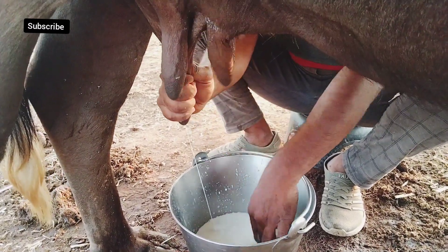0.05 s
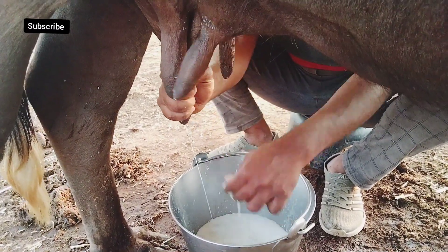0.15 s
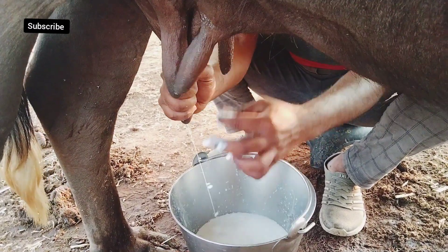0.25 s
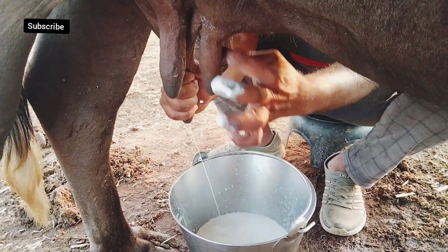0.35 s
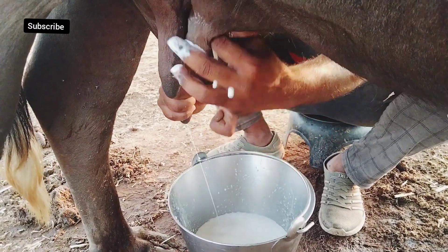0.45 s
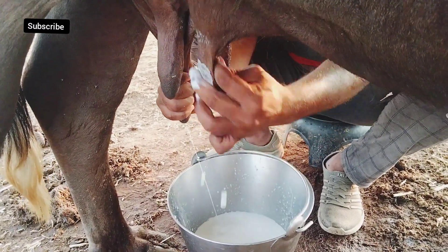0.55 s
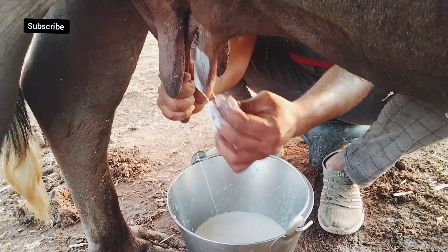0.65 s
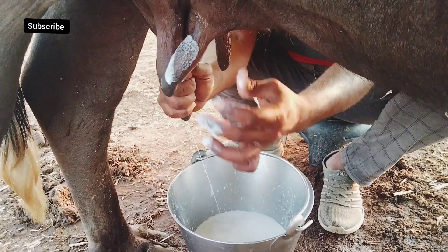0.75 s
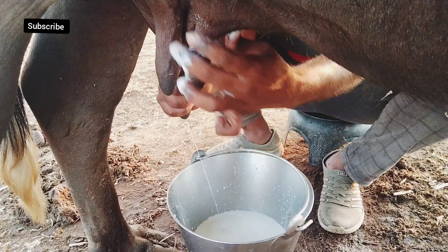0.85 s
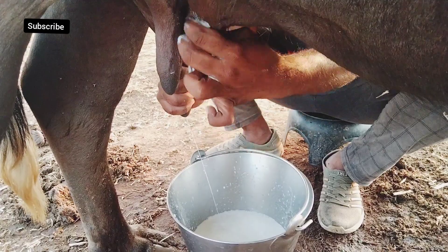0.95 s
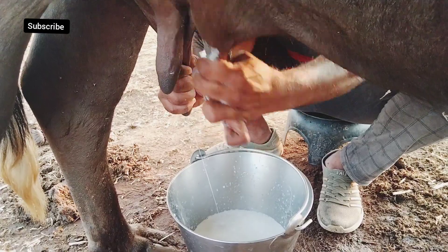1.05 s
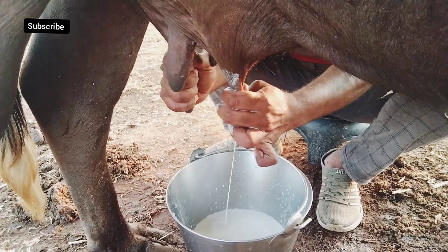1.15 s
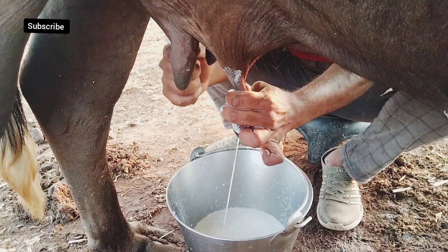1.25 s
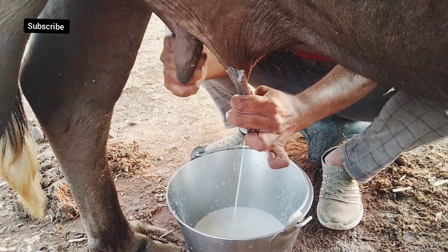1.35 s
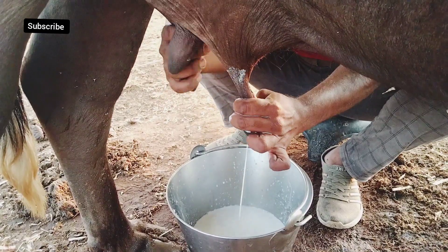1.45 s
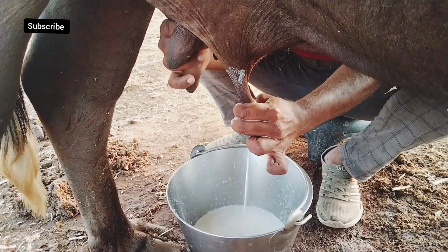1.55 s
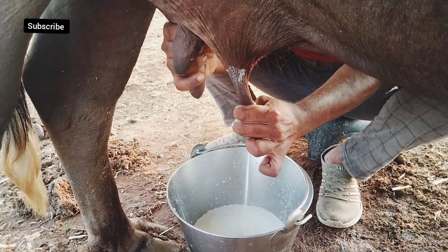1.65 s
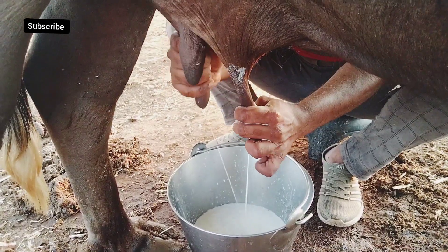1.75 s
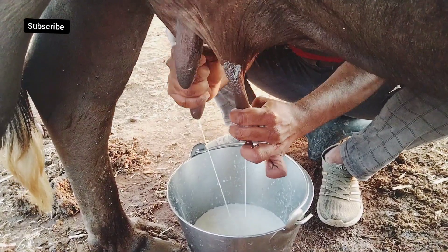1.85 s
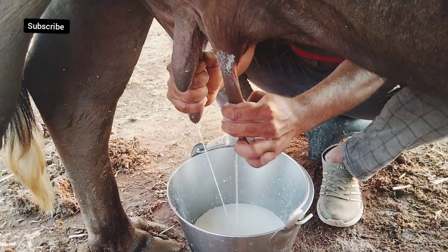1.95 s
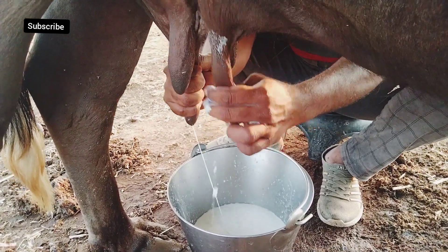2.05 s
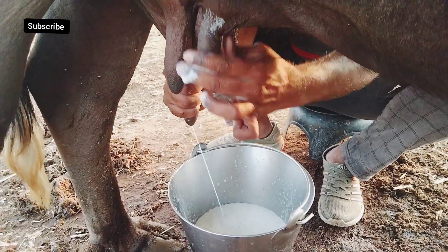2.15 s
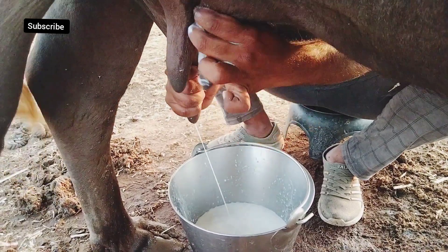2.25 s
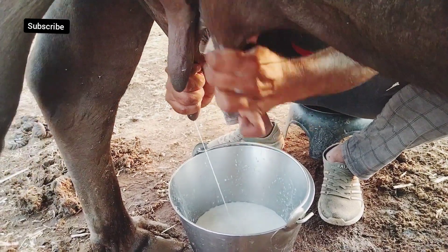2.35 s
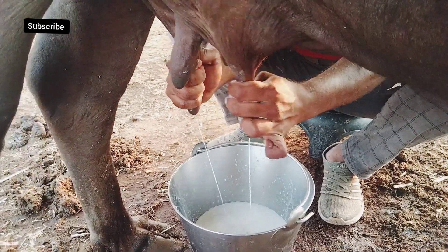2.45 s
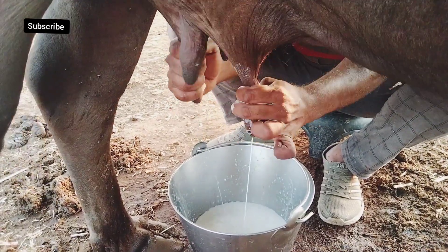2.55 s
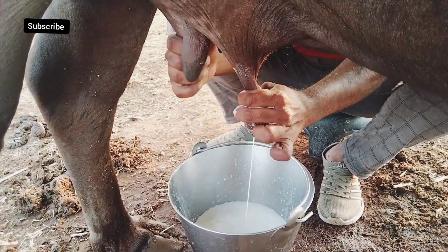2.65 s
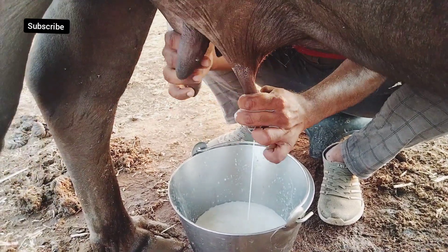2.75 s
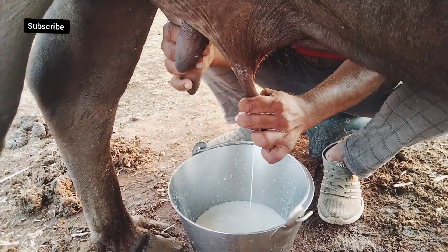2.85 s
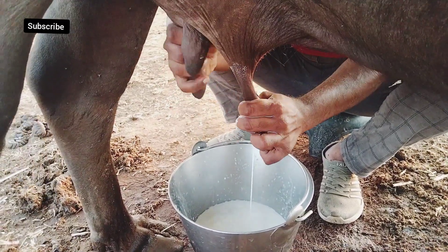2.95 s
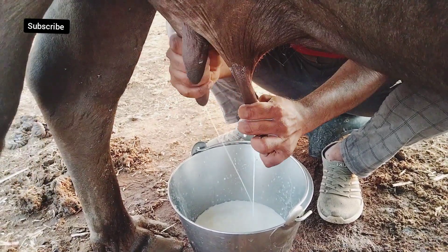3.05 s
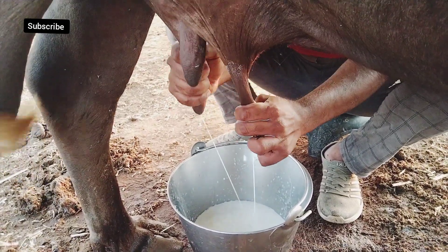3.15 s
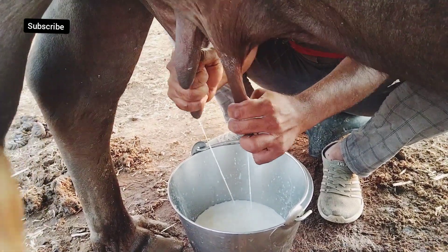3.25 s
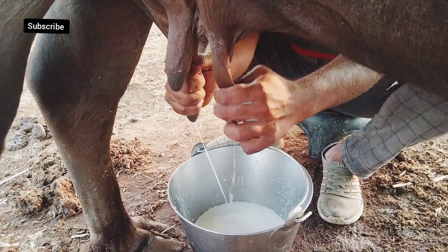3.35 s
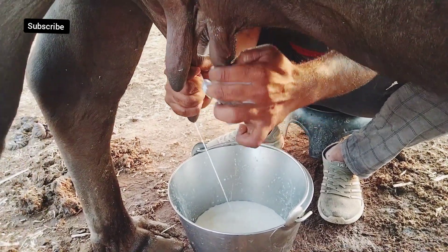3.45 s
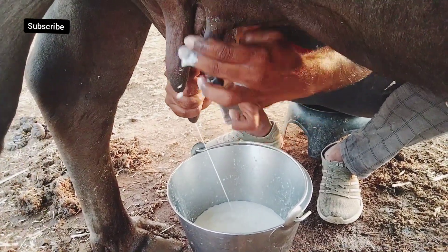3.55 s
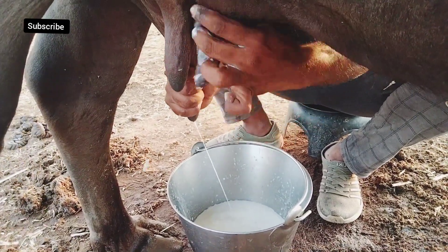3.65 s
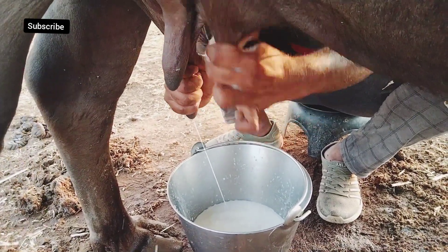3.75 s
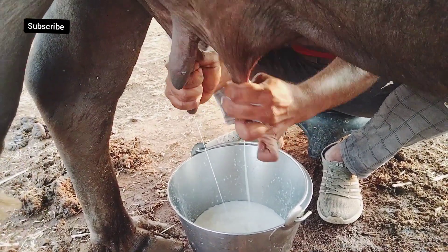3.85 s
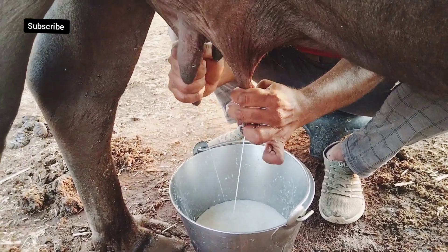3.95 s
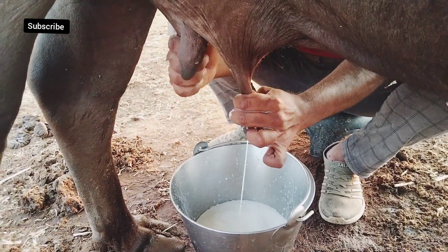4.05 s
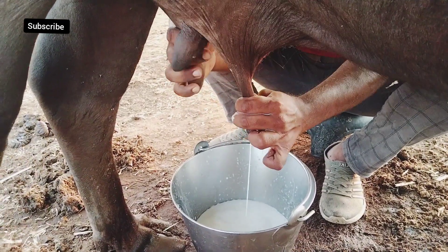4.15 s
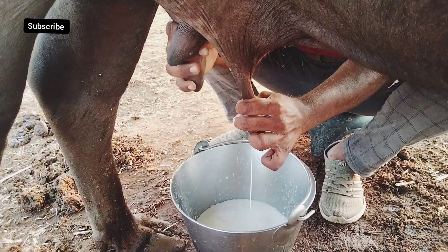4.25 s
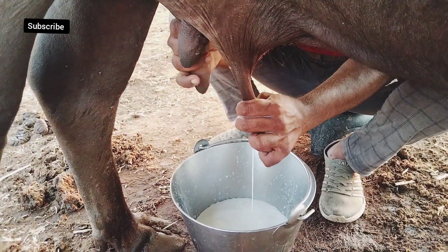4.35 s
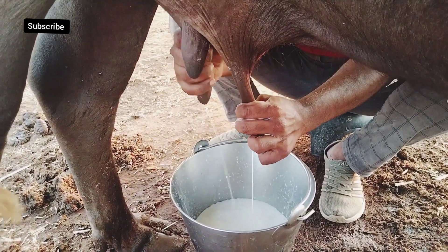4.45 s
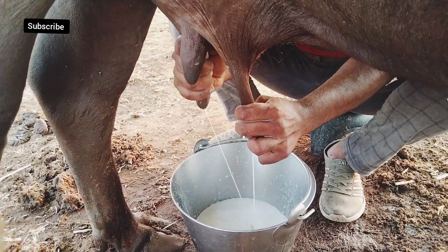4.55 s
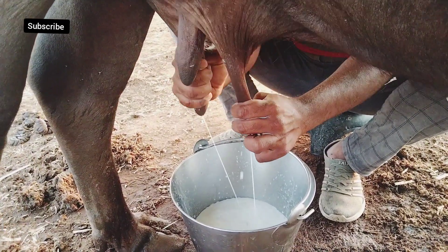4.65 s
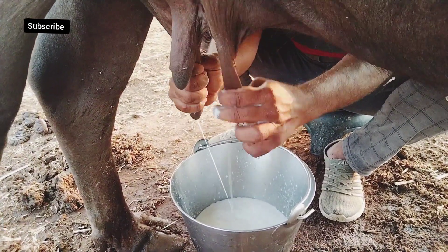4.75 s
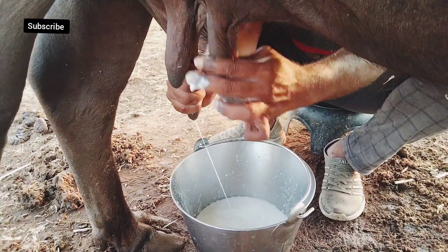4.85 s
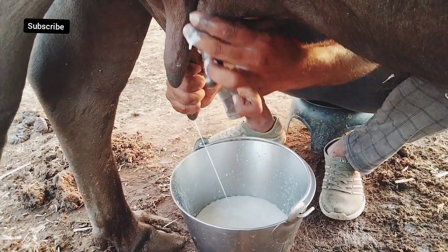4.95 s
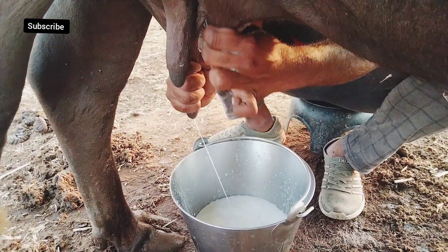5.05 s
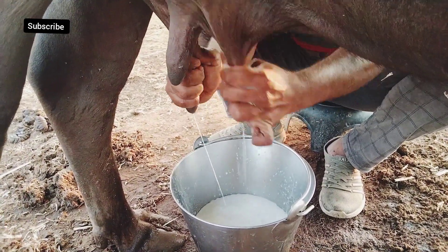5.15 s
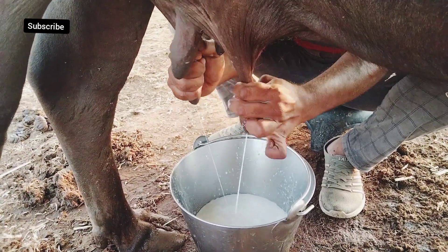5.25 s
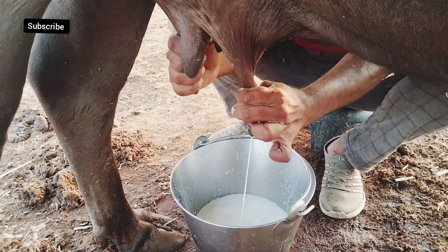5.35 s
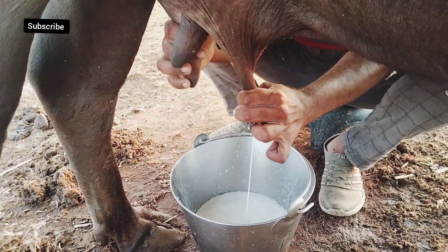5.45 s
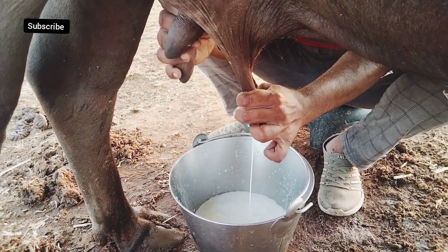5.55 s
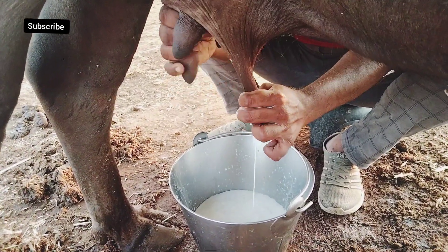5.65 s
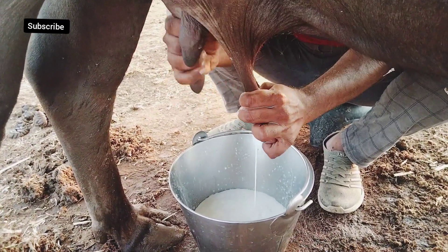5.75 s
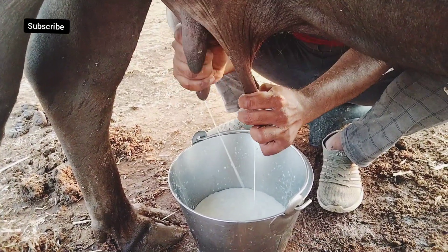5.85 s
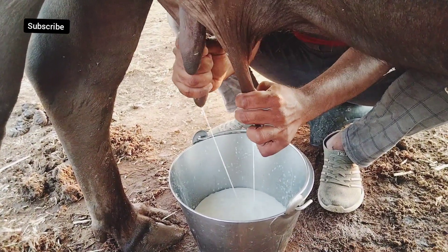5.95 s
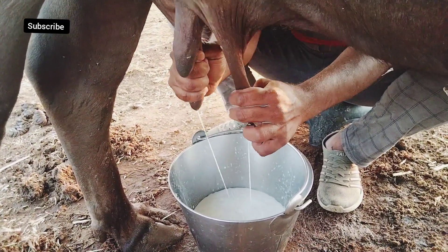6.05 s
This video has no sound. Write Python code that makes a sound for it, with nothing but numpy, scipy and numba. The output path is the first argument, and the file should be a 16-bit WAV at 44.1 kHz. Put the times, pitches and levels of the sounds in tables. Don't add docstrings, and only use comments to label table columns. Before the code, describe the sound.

Close outdoor sound of hand milking. At first only a dying trickle, tiny flicks of liquid, a dull thump, a short bell ring and a bird note. From just after one second, overlapping squirts hit frothy milk in a metal bucket about three or four times a second, with wet slaps, low gulps and fizzy spray, continuing to the end. The pail adds hollow ringing; the yard is faint and dry.

```python
import sys
import numpy as np
from scipy import signal
from scipy.fft import rfft, irfft, next_fast_len
from scipy.io import wavfile
from scipy.ndimage import uniform_filter1d
from numba import njit

SR = 44100
rng = np.random.default_rng(int(sys.argv[2]) if len(sys.argv) > 2 else 0)


def volts_from_db(level):
    exponent = np.asarray(level, float) / 20
    return 10 ** exponent


def unload_audio(sound):
    columns = np.transpose(np.atleast_2d(sound))
    steps = np.round(np.clip(columns, -1, 1) * 32767)
    wavfile.write(sys.argv[1], SR, steps.astype(np.int16))


N = 269451
TIME = np.arange(N) / SR


def unit_rms(x):
    return x / np.sqrt(np.mean(x ** 2))


@njit
def grains(rows, n):
    y = np.zeros(n)
    for r in rows:
        first, length = int(r[0] * SR), int(5 * r[2] * SR / r[1])
        phasor = r[3] + 0j
        advance = np.exp((2j * np.pi - 1 / r[2]) * r[1] / SR)
        glide = np.exp(2j * np.pi * r[1] * r[4] / SR / length)
        for k in range(first, min(first + length, n)):
            y[k] += phasor.imag
            phasor *= advance
            advance *= glide
    return y


def walk(rate, size=N):
    k = int(SR / rate)
    held = np.repeat(rng.standard_normal(size // k + 1), k)
    return 1.12 * uniform_filter1d(uniform_filter1d(held, k), k)[:size]


def resonances(hz, peaks, order=2):
    return sum(gain_db / (1 + (2 * (hz - f) / width) ** order) for f, width, gain_db in peaks)


def colour(x, table, lo_hz, hi_hz, rings=()):
    size = 8192
    hz, own = signal.welch(x, SR, nperseg=size)
    hz = hz + 1
    table_hz, table_db = np.transpose(table)
    db = np.interp(np.log(hz), np.log(table_hz), table_db)
    db = db - 10 * np.log10(uniform_filter1d(own, size=41) + 1e-18)
    db = db - 10 * np.log10((1 + (lo_hz / hz) ** 8) * (1 + (hz / hi_hz) ** 8))
    db = db + resonances(hz, rings)
    cepstrum = irfft(db * np.log(10) / 20)
    cepstrum[1:size // 2] *= 2
    cepstrum[size // 2 + 1:] = 0
    response = irfft(np.exp(rfft(cepstrum)))
    return unit_rms(signal.fftconvolve(x, response)[:N])


def arch(start, length, power):
    span = slice(int(start * SR), int((start + length) * SR))
    part = (TIME[span] - start) / length
    return span, part, np.abs(np.sin(np.pi * part)) ** power


def yard_air():
    # t/s, level/dB
    yard = [(0, 4.5), (.9, 10), (1.2, 8), (1.4, 16), (6.11, 18)]
    # f/Hz, level/dB per Hz
    floor = [(30, 18), (90, -3), (200, -10), (700, -9), (1500, -15), (3000, -20), (8000, -26), (15700, -26)]
    swell_db = 3 * walk(3.1)
    level_db = -70.5 + np.interp(TIME, *np.transpose(yard)) + swell_db
    return volts_from_db(level_db) * colour(rng.standard_normal(N), floor, 24.0, 13000)


def insects():
    # start t/s, end t/s, f/Hz, width/Hz, level/dB
    buzzes = [(0, .37, 3400, 200, -60), (0, .33, 1050, 130, -55), (0, .53, 670, 130, -58),
              (.85, 1.15, 4345, 120, -72), (.15, .37, 1830, 110, -59), (.55, .952, 1700, 140, -68),
              (.22, .53, 4330, 110, -72), (0, .18, 5000, 100, -74), (0, .1, 4300, 150, -70),
              (.13, .27, 4600, 120, -71), (.12, .2, 1560, 90, -70), (.49, .53, 880, 90, -63),
              (0, .36, 480, 80, -52), (.4, .62, 470, 120, -55), (.53, .8, 450, 90, -57),
              (.375, .63, 150, 130, -65), (.7, 1.05, 450, 90, -54), (.7, .86, 590, 70, -68),
              (.71, .745, 1270, 60, -70), (.58, .632, 2170, 70, -67), (.79, .88, 960, 70, -66),
              (.8, .835, 2600, 80, -67)]
    out = np.zeros(N)
    for start, end, hz, width, db in buzzes:
        span, part, shape = arch(start, end - start, 0.49)
        wander = walk(width, size=len(part)) + 1j * walk(width, size=len(part))
        tone = (wander * np.exp(2j * np.pi * hz * TIME[span])).real
        out[span] += volts_from_db(db - 11.6 * part + 4.1 * walk(26.7, size=len(part))) * shape * tone
    return out


def birds():
    # start t/s, length t/s, first f/Hz, last f/Hz, level/dB
    notes_sung = [(0.508, 0.11, 3780, 3200, -76), (0.685, 0.055, 3590, 3180, -65),
                  (1.056, 0.094, 3740, 2990, -60), (1.478, 0.13, 3400, 2830, -63),
                  (1.897, 0.02, 3710, 3400, -48), (1.917, 0.052, 3690, 5060, -55),
                  (2.218, 0.098, 5700, 6330, -69), (2.42, 0.17, 6300, 7000, -71),
                  (2.54, 0.12, 6800, 7300, -83), (2.67, 0.2, 7150, 7150, -71),
                  (2.86, 0.092, 7270, 8000, -62), (3.785, 0.042, 4820, 5520, -75),
                  (3.835, 0.082, 5280, 6300, -68), (5.118, .09, 3610, 4100, -71.5),
                  (5.205, 0.11, 4250, 5260, -63), (4.89, 0.048, 5500, 6400, -72)]
    out = np.zeros(N)
    for s, length, start_hz, end_hz, db in notes_sung:
        hoarse = .32 if start_hz + end_hz < 2 * 8000 else .8
        span, part, shape = arch(s, length, 0.26)
        hz = (start_hz + (end_hz - start_hz) * part) * (1 + 0.042 * hoarse * walk(400, size=len(part)))
        whistle = np.sin(2 * np.pi * np.cumsum(hz) / SR)
        out[span] += volts_from_db(db + 4.0 + 13.0 * hoarse * walk(74, size=len(part))) * shape * whistle
    age = TIME[:SR // 3]
    tail = volts_from_db(-43.0) * rng.standard_normal(len(age)) * np.exp(-age / 0.054)
    return out + signal.fftconvolve(out, tail)[:N]


def bell():
    strikes = {.6455: [(-54, 11, 0.091, 0.71), (-52.5, 18, 0.071, 1), (-68, 23, .2, 0.6),
               (-46.5, 38.5, 0.22, 0.93), (-40.5, 77.5, 0.39, 0.97), (-70, 188, .3, .5), (-55, 109, .3, .5),
               (-48.5, 154, .2, 0.4)], 4.0005: [(-65, 58, .2, 0.6), (-42.5, 84, 0.29, 0.9),
               (-51, 63, .01, 0.7), (-45.5, 67, 0.38, .95), (-54, 63, 0.51, 1), (-40.5, 131, 0.19, 0.9),
               (-47, 202, 0.15, .8), (-41.5, 130, 0.17, 0.9)]}
    bell_hz = [1956, 2005.5, 4968, 5016, 9066, 9114, 14128, 14157]
    swing_hz = 0.94
    out = 0
    for hit, partials in strikes.items():
        age = np.clip(TIME - hit, 0, None)
        onset = np.clip(age / 0.0038, 0, 1)
        for hz, (db, fade_db, away_s, depth) in zip(bell_hz, partials):
            facing = np.sqrt(1 - (depth * np.cos(2 * np.pi * swing_hz * (age - away_s))) ** 2)
            out = out + onset * volts_from_db(db + 5 - fade_db * age) * facing * np.sin(2 * np.pi * hz * age)
        bright_noise = np.diff(rng.standard_normal(N + 1))
        out = out + volts_from_db(-47.5) * (age > 0) * np.exp(-age / 0.011) * bright_noise
    return out


def low_knocks(table, cycles, soft_s, trim_db):
    s, db, hz = np.transpose(table)
    ring = grains(np.c_[s, hz, cycles + 0 * s, volts_from_db(db + trim_db), .05 + 0 * s], N)
    push = np.hanning(int(soft_s * SR) + 3)
    return np.convolve(ring, push / push.sum())[:N]


def thumps():
    # t/s, peak level/dB, f/Hz
    knocks = [
        (0.368, -38.5, 198),
        (2.863, -40.5, 130),
        (6.078, -45, 272),
    ]
    return low_knocks(knocks, 1.0, 0.0018, 7.9)


def gulps():
    # t/s, peak level/dB, f/Hz
    pockets = [(1.271, -14, 470), (1.374, -14, 370), (1.48, -20, 434), (1.548, -8.5, 456), (2.2, -20, 406),
               (2.232, -15, 395), (2.315, -14, 391), (2.668, -7, 396), (2.584, -12.5, 355),
               (2.742, -9.5, 391), (3.012, -11, 358), (3.145, -9, 361), (3.406, -26, 383),
               (3.663, -15, 370), (3.69, -17, 378), (5.053, -12, 385), (5.093, -11, 414), (.002, -21, 330),
               (.058, -25, 336), (4.032, -7, 365), (4.107, -9.5, 371), (4.4, -14, 438), (4.489, -18, 428),
               (4.641, -7, 427), (5.176, -11.5, 374), (5.331, -21, 312), (5.426, -9, 434),
               (5.477, -10.5, 495), (5.561, -13.5, 447), (5.631, -11.5, 355), (5.738, -19, 328),
               (5.8, -14.5, 330)]
    less_bass = signal.butter(2, 220, "high", fs=SR, output="sos")
    return signal.sosfilt(less_bass, low_knocks(pockets, 4.94, 0.0014, -15.5))


def slaps():
    # t/s, peak level/dB, f/Hz
    jet_slaps = [(0.1354, -63, 3660), (0.5504, -38, 6100), (0.8144, -71, 4900), (1.2412, -36, 4740),
                 (1.272, -33, 2130), (1.7391, -21, 2650), (2.1285, -22, 2380), (2.14, -24, 2617),
                 (2.175, -24, 2360), (2.565, -31.5, 3800), (2.579, -25, 3800), (2.593, -26, 2340),
                 (2.6167, -28, 2400), (2.6793, -40, 2550), (3.1593, -27.5, 2820), (3.4007, -30, 3040),
                 (3.5248, -19, 2700), (3.945, -36, 3960), (4.02, -27, 5010), (4.4738, -25, 5300),
                 (4.5291, -27.5, 2590), (4.8396, -28, 5300), (5, -29.5, 2160), (5.1185, -43, 2640),
                 (5.311, -31, 4340), (5.382, -31, 1900), (5.413, -17.5, 2260), (5.418, -25, 2120),
                 (5.4763, -28, 2650), (5.542, -28, 2100), (5.6167, -26.5, 2350), (5.8008, -34.5, 2500),
                 (5.8526, -31.5, 2330),
                 (0.084, -51, 4530), (.179, -60, 1490), (.256, -58, 5000), (.281, -53, 2400), (.281, -43, 6360),
             (.826, -43, 8050), (1.627, -49, 1040), (2.445, -46, 12500), (2.496, -36, 12400),
             (3.918, -45, 10200), (3.763, -53, 6810), (5.16, -42, 5700), (2.295, -30, 1590),
             (2.385, -43, 980), (2.445, -34.5, 1750), (3.597, -34.5, 1110), (3.648, -35.5, 1040),
             (3.691, -36, 1070), (3.918, -82.5, 3370), (5.067, -38, 1075), (5.382, -29, 1050),
             (5.476, -28, 1200), (5.542, -32, 1100), (5.618, -32, 1160), (5.681, -29, 1110),
             (5.801, -27, 680)]
    s, db, hz = np.repeat(np.array(jet_slaps), 16, axis=0).T
    u = rng.random((len(s), 3))
    late_s = 0.01 * u[:, 0] ** 2
    octaves = 2.31 * ((np.arange(len(s)) % 16 + u[:, 1]) / 16) ** 2 - .18
    bubble_hz = np.clip(hz * 2 ** octaves, 500, 15000)
    size = volts_from_db(db - 6 - 600 * late_s - 6.0 * np.abs(octaves) - 5 * u[:, 2])
    return grains(np.c_[s + late_s, bubble_hz, 2.4 + 0 * s, size, .15 + 0 * s], N)


def flow():
    # t/s, length t/s, force/dB, spray over usual/dB, droop/dB
    trickles = [(-.05, 0.45, -40, -16, 12.5), (0.154, 0.16, -80, 16, 12), (0.333, 0.2, -42, -49, 8),
                (0.51, 0.9, -65.5, -15, 9), (0.405, 0.1, -61.5, 14.5, 6.5), (2.33, 0.18, -51.5, 8.5, 10),
                (3.59, 0.36, -54.5, 5.5, 9.5), (5.11, 0.16, -54, 6, 5)]
    # t/s, length t/s, force level/dB, spray over usual/dB, droop to the end/dB
    squirts = [(1.229, 0.03, -54, 24, 19), (1.253, 0.082, -29, -10.5, 3.5), (1.331, 0.13, -39, 4.5, 0),
               (1.451, 0.14, -39.5, 8.5, 0), (1.598, 0.29, -40, 11.5, 2.5), (1.871, 0.3, -37.5, 3, 1),
               (2.149, 0.18, -37, 0.5, 3), (2.31, 0.21, -39.5, -3, 4.5), (2.545, 0.29, -37, 0, -1),
               (2.826, 0.39, -39.5, 7, 1), (3.215, 0.21, -36.5, 1.5, 5.5), (3.376, 0.21, -39.5, 3, 7.5),
               (3.549, 0.38, -42, -1, 11), (3.926, 0.11, -50.5, 10, -5), (4.004, 0.19, -39, 4.5, -2),
               (4.173, 0.425, -39, 4.5, -0.5), (4.6, 0.41, -38, 3.5, 8), (4.941, 0.15, -35.5, -4.5, 0),
               (5.089, 0.21, -37.5, -7.5, 12), (5.299, 0.1, -46, 8, -4.5), (5.37, 0.1, -40, 1.5, 1),
               (5.466, 0.15, -39.5, 6, 3), (5.577, 1, -38, 0, -4.5)]
    # t/s, length t/s, force level/dB, spray over usual/dB
    splatters = [(0.174, .04, -57, 14.5), (0.233, 0.07, -64, 21.5), (0.365, 0.059, -54, 27),
                 (0.453, 0.029, -64, 13), (0.543, 0.017, -60, 24), (0.645, 0.055, -64, 12.5),
                 (0.806, 0.05, -63.5, 20), (1.503, 0.04, -53, 3), (2.114, 0.1, -35.5, 14),
                 (2.171, 0.023, -40.5, 24), (2.53, 0.089, -52.5, 19.5), (2.679, 0.013, -30, 12.5),
                 (3.52, 0.04, -33.5, 4), (3.91, 0.025, -59, 14), (3.694, 0.025, -56, 2),
                 (4.635, 0.041, -25, -13), (5.016, 0.06, -65, 17), (5.425, 0.04, -28, 0.5),
                 (5.473, 0.015, -34, 10), (5.61, 0.21, -31.5, -1), (5.796, 0.023, -38, 4)]
    # level under the force/dB, share of the spray, share of the droop
    sizes = [(-1.5, 0.22, 1.13), (-11, 0.39, 1.1), (-17.5, 0.88, 1.01), (-22, 0.86, 1.09)]
    squeeze_s, splat_s, let_go_s = .035, .008, .02
    rows = [(*r, squeeze_s, 2) for r in trickles + squirts]
    rows += [(*r, 19.5, splat_s, 1) for r in splatters]
    power = np.full((4, N), 1e-14)
    for s, length, force_db, spray_db, droop_db, rise_s, bend in rows:
        span = slice(max(int(s * SR), 0), int((s + length + 8 * let_go_s) * SR))
        age = TIME[span] - s
        droop = droop_db * np.clip(age / length, 0, 1) ** bend
        gate = np.clip(age / rise_s, 0, 1) * np.exp(-np.clip(age - length, 0, None) / let_go_s)
        for size, (under_db, spray, fade) in zip(power, sizes):
            size[span] += (gate * volts_from_db(force_db + under_db + spray * spray_db - fade * droop)) ** 2
    spatter_db = 10 * np.log10(power[2])
    weak = .09 * (-56 - spatter_db)
    return np.sqrt(power), weak


def drops(count, lo_hz, hi_hz, cycles, scatter_db, glide, wash):
    u = rng.random((count, 3))
    s = u[:, 0] * N / SR
    hz = lo_hz * (hi_hz / lo_hz) ** u[:, 1]
    size = volts_from_db(-scatter_db * np.log(u[:, 2]))
    rows = np.c_[s, hz, np.full(count, cycles), size, np.full(count, glide)]
    return unit_rms(grains(rows, N)) + wash * rng.standard_normal(N)


def banded(x, makeup_db=2.5):
    # f/Hz, width/Hz, level/dB
    gaps = [(1390, 47, -13), (2030, 78, -16), (2330, 390, -9), (3400, 260, -2), (4370, 340, -27),
            (5420, 250, -18), (8260, 330, -21), (9200, 650, -9), (10600, 310, -5), (11700, 230, 1),
            (13100, 220, -14)]
    size = next_fast_len(N)
    hz = np.fft.rfftfreq(size, 1 / SR)
    return irfft(rfft(x, size) * volts_from_db(resonances(hz, gaps) + makeup_db), size)[:N]


def landing(x):
    # start t/s, end t/s, f/Hz, width/Hz, level/dB
    nulls = [(0, 0.49, 1300, 250, -13), (.3, 0.475, 990, 250, -8), (0, 0.182, 1870, 500, -14),
             (0.062, .3, 2700, 250, -17), (1.433, 1.73, 1890, 110, -4.5), (1.93, 2.108, 1830, 129, -5),
             (1.956, 2.117, 1550, 119, -13), (1.966, 2.018, 6460, 3000, -4.5), (1.997, 2.11, 3440, 400, -9),
             (0.586, 1.406, 192, 109.5, -20), (0, 0.313, 159, 93, -34), (2.62, 2.88, 3230, 200, -5),
             (2.88, 3.145, 1770, 120, -23), (2.902, 3.097, 7450, 250, -6), (3.303, 3.529, 2350, 248, -28),
             (3.568, 3.973, 2280, 300, -14), (3.68, 3.913, 4470, 500, -11), (3.89, 3.957, 1480, 378, -18),
             (4.155, 4.638, 1810, 121, -20), (4.208, 4.58, 1565, 130, -14), (4.142, 4.347, 3180, 218, -12),
             (4.503, 4.661, 3800, 197, -9), (4.75, 4.891, 4970, 199, -10), (4.892, 5.35, 3420, 200, -19),
             (4.914, 5.199, 4570, 300, -13), (5.104, 5.334, 2560, 350, 2), (5.295, 5.36, 1700, 400, -8),
             (5.553, 5.72, 3257, 200, -4), (5.695, 5.86, 4440, 200, -7), (5.655, 5.905, 7600, 500, -8),
             (5.984, 6.112, 3700, 203, -19)]
    # start t/s, end t/s, f/Hz, width/Hz, level/dB
    blooms = [(1.473, 1.55, 7600, 1200, 6.5), (1.5, 1.95, 4100, 1400, 4), (1.1, 1.6, 770, 220, 3.5),
              (5.2, 5.7, 1180, 210, 5), (2.24, 2.6, 3000, 300, 5.5), (0.18, 0.37, 13500, 3800, 12),
              (1.59, 1.94, 5700, 1100, 5.5), (1.63, 1.9, 3030, 350, 5.5), (2.2, 2.9, 740, 397, 2),
              (2.287, 2.522, 1790, 470, 8.5), (2.1, 2.2, 3460, 200, 3.5), (2.303, 2.4, 5000, 250, 5),
              (2.35, 2, 5800, 190, 3.5), (2.623, 3, 6840, 560, 5), (2.9, 3.15, 6200, 990, 5.5),
              (3.302, 3.5, 3620, 360, 4.5), (3.46, 4.1, 2830, 370, 3.5), (3.697, 4.07, 860, 530, 4.5),
              (3.4, 4, 1760, 400, 6.5), (3.594, 3.9, 3720, 310, 4.5), (3.8, 4, 5040, 500, 8.5),
              (3.2, 4.5, 240, 83, 1.5), (4.306, 3.9, 4330, 500, 4.5), (4.603, 4.62, 2900, 2000, 6.5),
              (4.657, 5, 5300, 520, 4), (5, 5.2, 2950, 320, 6.5), (5.23, 5.5, 820, 520, 4),
              (5.35, 5.7, 190, 68, 7.5), (5.5, 5.7, 4400, 700, 6), (5.3, 5.566, 6800, 890, 7),
              (5.8, 5.7, 6800, 1100, 7), (2.34, 2.55, 15400, 3600, 3), (5.21, 5.32, 12000, 6200, 6),
              (5.1, 5.3, 4700, 2000, 4), (2.35, 2.52, 4200, 2300, 2), (3.6, 3.76, 5600, 1700, 2),
              (1.28, 1.53, 3600, 2000, 1.5), (1.36, 1.75, 250, 57, 11), (6.5, 5.9, 5800, 800, 3)]
    hop, size = 256, 1024
    hz, s, z = signal.stft(x, SR, nperseg=size, noverlap=size - hop)
    patches = rng.standard_normal(z.shape)
    for _ in range(2):
        patches = uniform_filter1d(patches, size=5, axis=0)
        patches = uniform_filter1d(patches, size=7, axis=1)
    db = 1.2 * unit_rms(patches) * (hz > 600)[:, None]
    for start, end, f, width, gain_db in nulls + blooms:
        held = np.clip(np.minimum(s - start, end - s) / 0.055 + .5, 0, 1)
        db = db + np.outer(resonances(hz, [(f, width, gain_db)], order=4), held)
    return signal.istft(z * volts_from_db(db), SR, nperseg=size, noverlap=size - hop)[1][:N]


def jets():
    # f/Hz, level/dB per Hz
    pail = [(35, -21), (60, -62.5), (197, -12.5), (273, -7.5), (344, -4.5), (445, 2.5), (511, -9),
            (854, -22.5), (1300, -18.5), (1840, -23.5), (2070, -20.5), (3300, -24), (5770, -26),
            (8570, -29), (15700, -19.5)]
    # f/Hz, width/Hz, level/dB
    rings = [(222.4, 51, 7), (355, 52, 8), (464.8, 23, 3.5), (567, 99, 4.5), (725, 170, 4), (1051, 143, 6),
             (1306, 86, 6.5), (1700, 140, 3), (1977, 49, -1.5), (2073, 420, 5), (2340, 29, 8),
             (2507, 30, -7), (2870, 310, 4.5), (3400, 29, -12), (3800, 120, 0.5), (4400, 70, 6),
             (5010, 85, 4.5), (5700, 380, 2), (6950, 2200, 1)]
    # f/Hz, width/Hz, level/dB
    fizz_rings = [(7500, 81, -14), (7860, 190, 7.5), (8990, 1240, 8), (10140, 810, 3), (12000, 3500, 6.5),
                  (13600, 390, -3), (14700, 580, 6.5)]
    (gurgling, splashing, spattering, hissing), weak = flow()
    waver, pulse = walk(18), walk(12)

    gurgle = drops(count=4000, lo_hz=114.2, hi_hz=910, cycles=1.88, scatter_db=1.37, glide=0.27, wash=0.046)
    splash = drops(count=12000, lo_hz=618.5, hi_hz=2260, cycles=3.3, scatter_db=1.0, glide=0.094, wash=0.12)
    spatter = drops(count=30000, lo_hz=1695, hi_hz=8040, cycles=4.8, scatter_db=1.6, glide=0.12, wash=0.4)
    hiss = drops(count=30000, lo_hz=6540, hi_hz=17450, cycles=19.0, scatter_db=2.0, glide=0.033, wash=1.0)
    gurgle = colour(gurgle, pail, 47, 950, rings)
    splash = colour(splash, pail, 697, 1806, rings)
    spatter = colour(spatter, pail, 2270, 6800, rings)
    hiss = colour(hiss, pail, 6900, 18300, fizz_rings)

    gurgle = gurgle * gurgling * volts_from_db(0.13 * waver)
    spray = splash * splashing * volts_from_db(2.0 * waver)
    spray = spray + spatter * spattering * volts_from_db(2.5 + 0.24 * waver + 1.4 * pulse)
    spray = spray + hiss * hissing * volts_from_db(0.5 + 0.6 * waver + pulse + 1.4 * walk(21.05))
    spray = spray * volts_from_db(1.6 * walk(55))
    weak = np.clip(weak + .12 * walk(5.8), 0, 1)
    return landing(gurgle + (1 - weak) * spray + weak * banded(spray))


def scene():
    background = yard_air() + insects() + birds() + bell()
    return (background + thumps() + gulps() + slaps() + jets())[None]


def denoise(x, memory_s=0.78, smooth_s=0.076, strength=0.093, depth_db=-16):
    hop, size = 256, 1024
    z = signal.stft(x, SR, nperseg=size, noverlap=size - hop)[2]
    now = uniform_filter1d(np.abs(z) ** 2, max(int(smooth_s * SR / hop), 1), axis=-1)
    now = uniform_filter1d(now, size=3, axis=-2) + 1e-18
    keep = np.exp(-hop / SR / memory_s)
    broad = np.exp(uniform_filter1d(np.log(now), size=15, axis=-2))
    learnt = signal.lfilter([1 - keep], [1, -keep], broad, axis=-1, zi=keep * broad[..., :1])[0]
    gain = np.maximum(1 - strength * learnt / now, volts_from_db(depth_db))
    return signal.istft(z * gain, SR, nperseg=size, noverlap=size - hop)[1][..., :N]


def top_cut(x):
    return signal.sosfilt(signal.butter(12, 16470, fs=SR, output="sos"), x)


def record(dry):
    thin_bass = signal.butter(3, 130, "high", fs=SR, output="sos")
    cut_top = signal.ellip(10, .2, 70, 15720, fs=SR, output="sos")
    x = denoise(signal.sosfilt(thin_bass, dry))
    x = signal.sosfilt(cut_top, x)
    return top_cut(x)


dry = scene()
out = record(dry)
unload_audio(out)
```